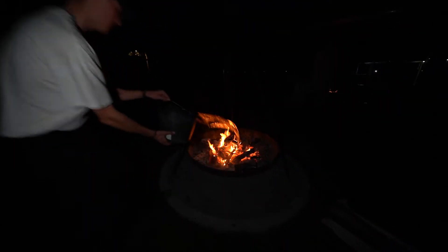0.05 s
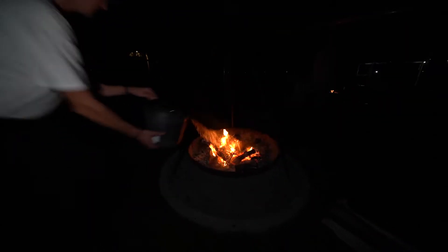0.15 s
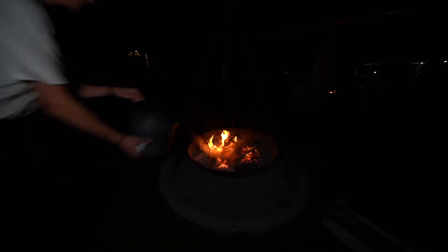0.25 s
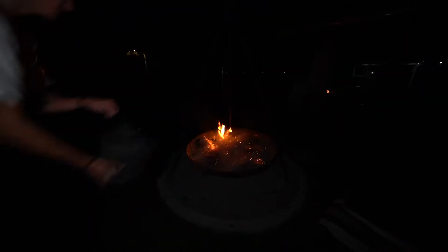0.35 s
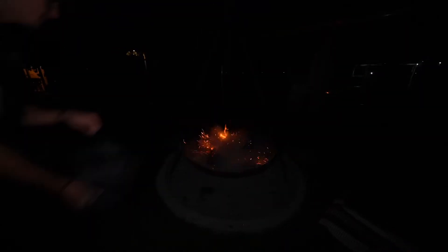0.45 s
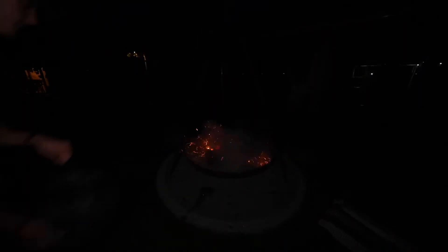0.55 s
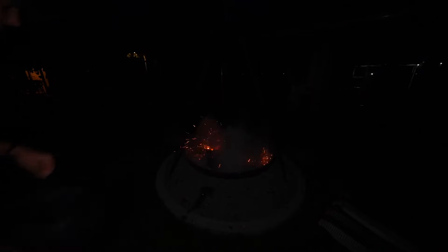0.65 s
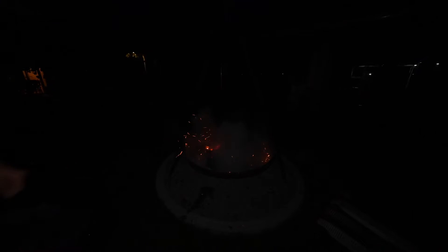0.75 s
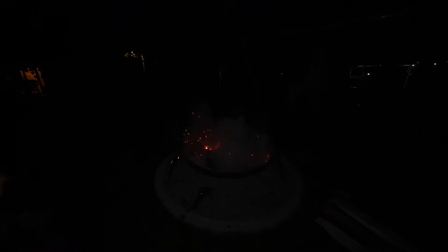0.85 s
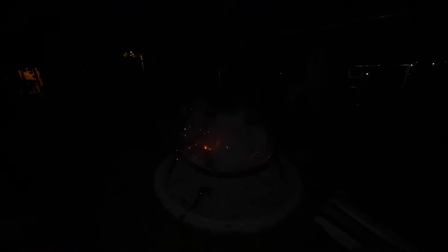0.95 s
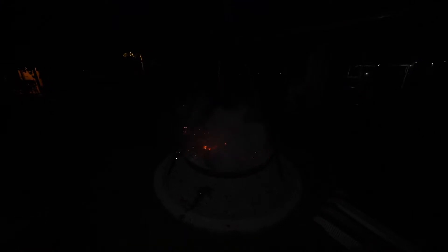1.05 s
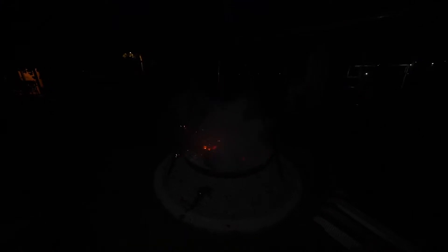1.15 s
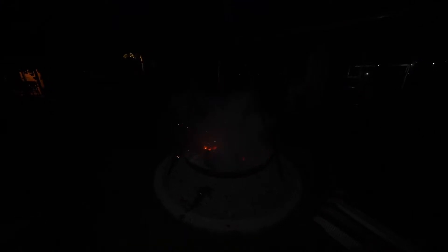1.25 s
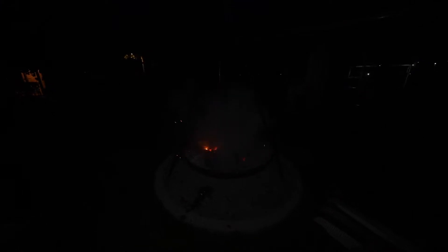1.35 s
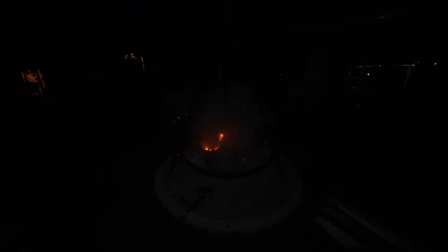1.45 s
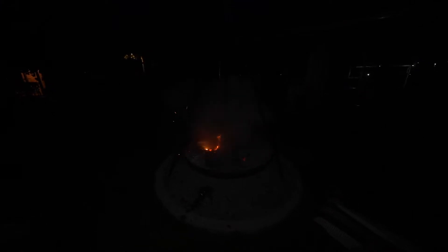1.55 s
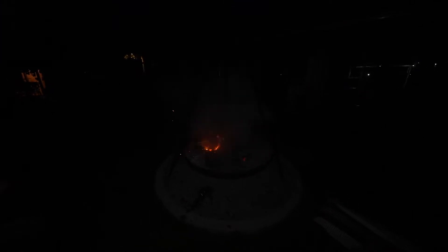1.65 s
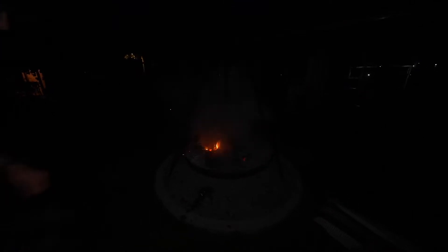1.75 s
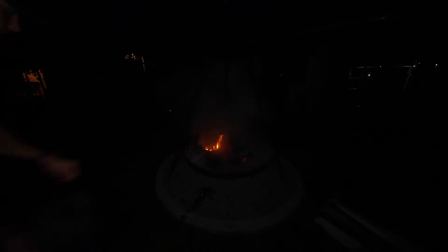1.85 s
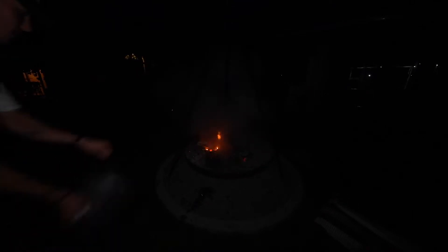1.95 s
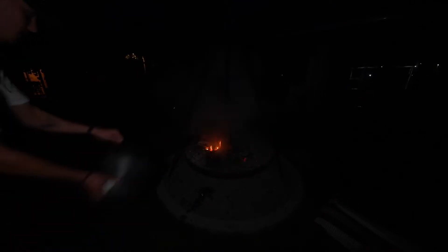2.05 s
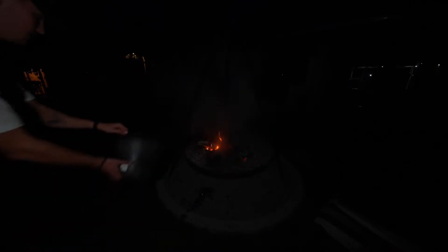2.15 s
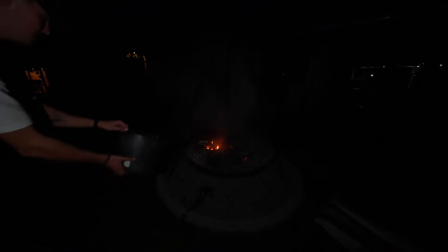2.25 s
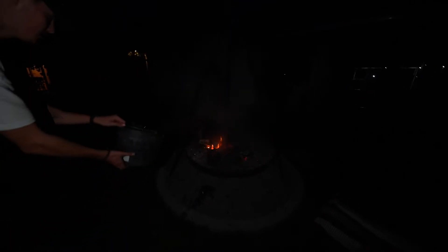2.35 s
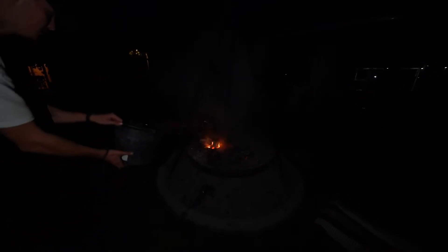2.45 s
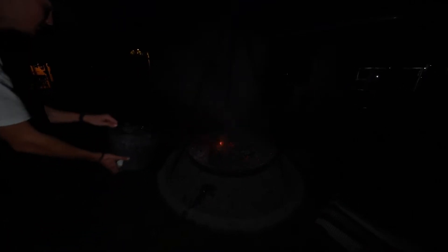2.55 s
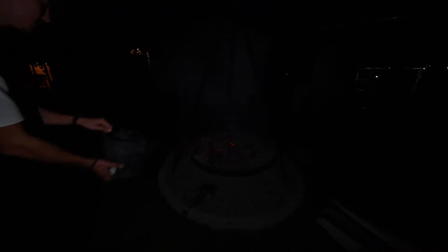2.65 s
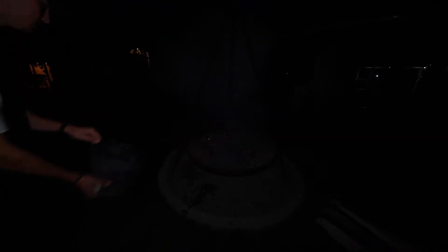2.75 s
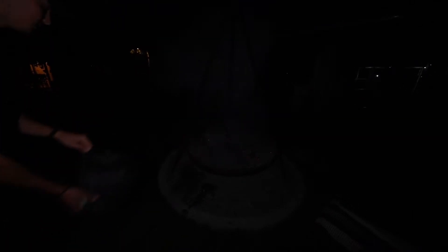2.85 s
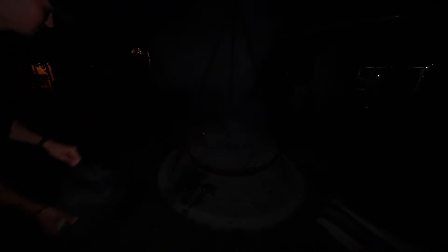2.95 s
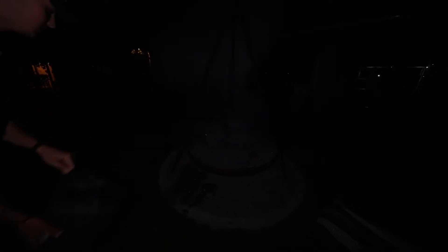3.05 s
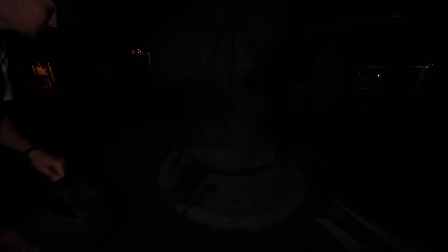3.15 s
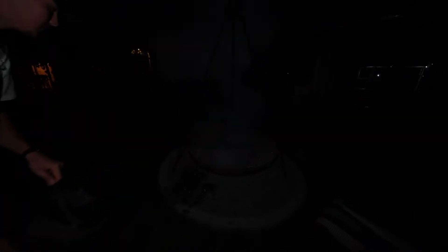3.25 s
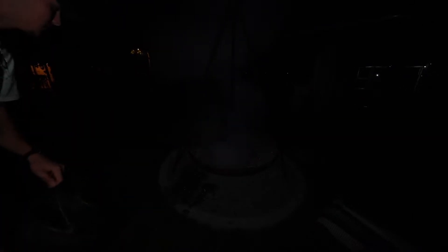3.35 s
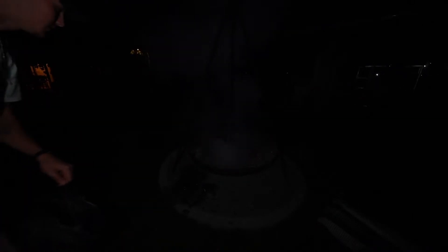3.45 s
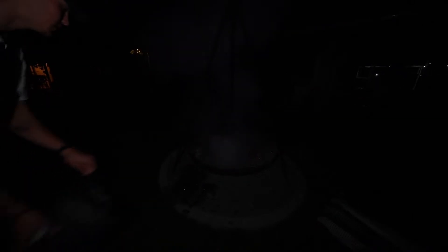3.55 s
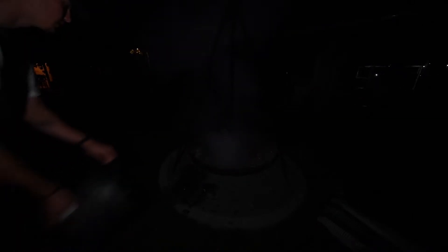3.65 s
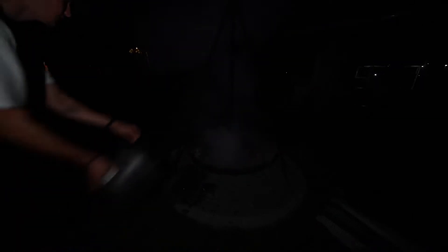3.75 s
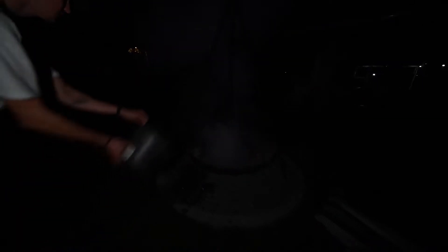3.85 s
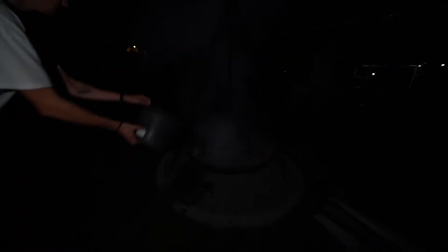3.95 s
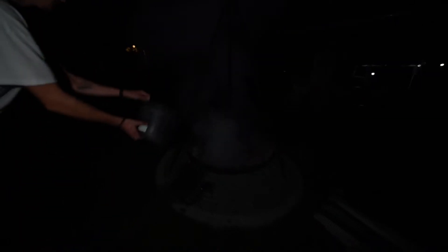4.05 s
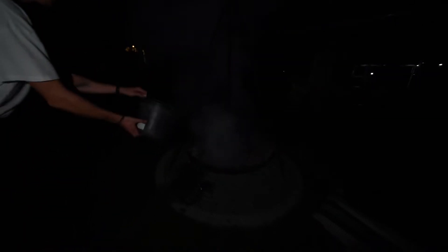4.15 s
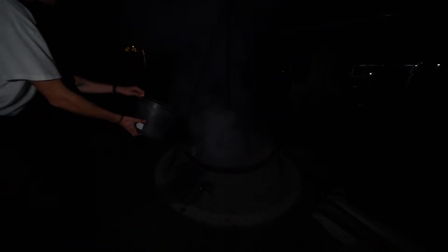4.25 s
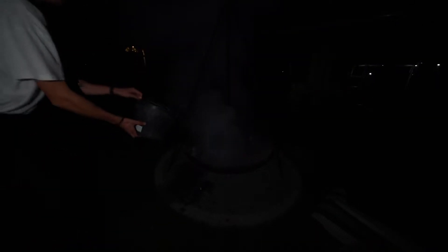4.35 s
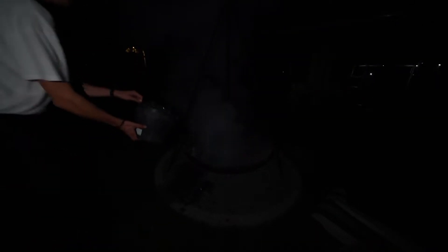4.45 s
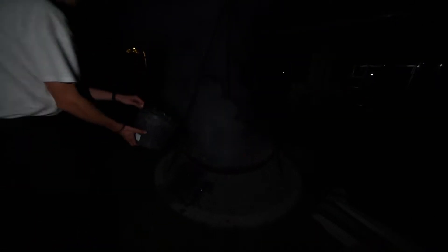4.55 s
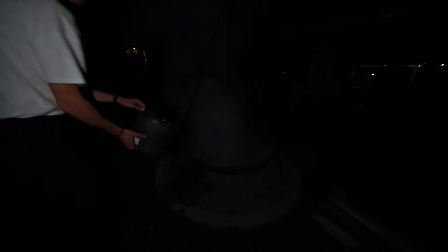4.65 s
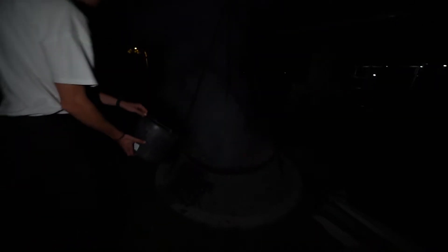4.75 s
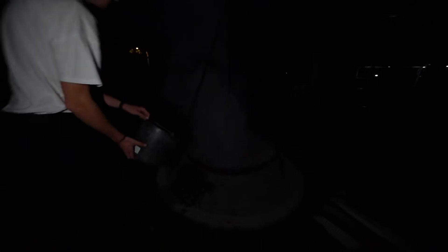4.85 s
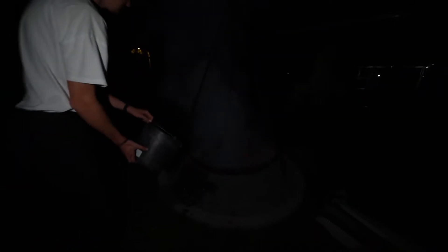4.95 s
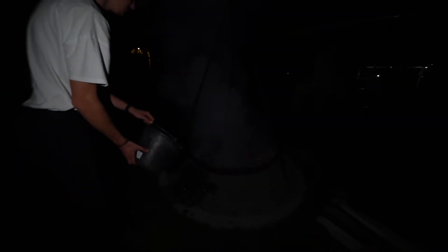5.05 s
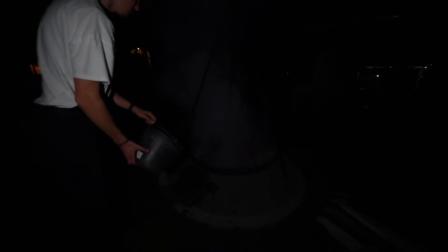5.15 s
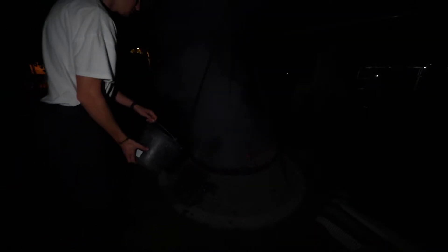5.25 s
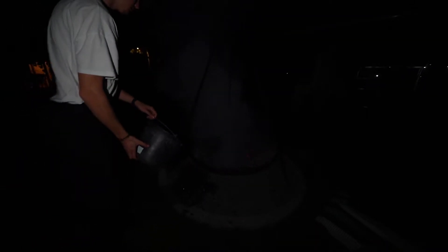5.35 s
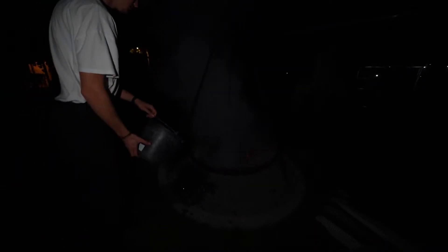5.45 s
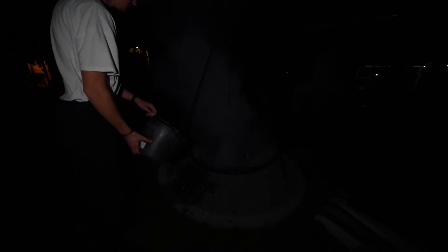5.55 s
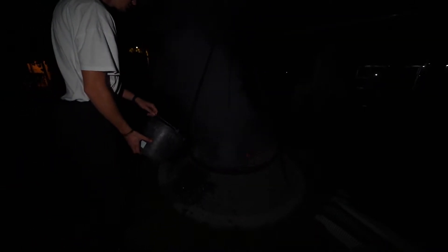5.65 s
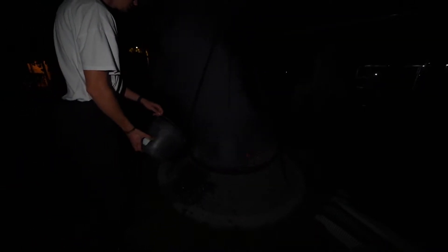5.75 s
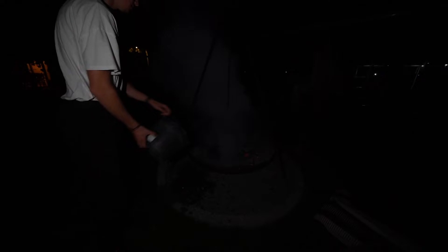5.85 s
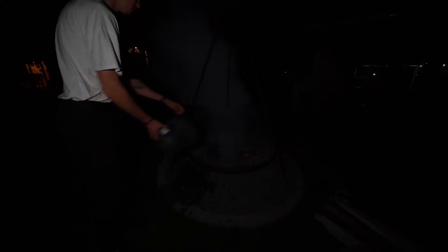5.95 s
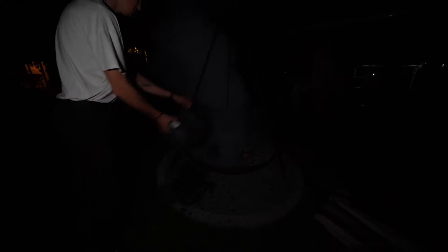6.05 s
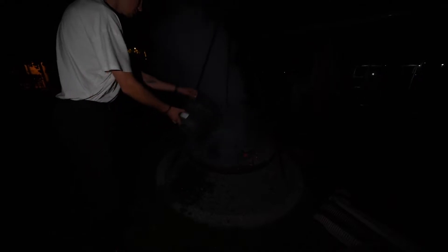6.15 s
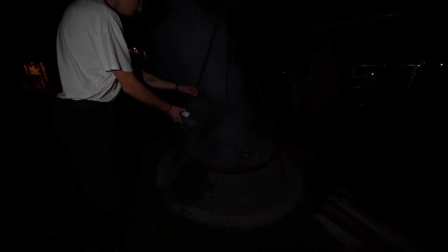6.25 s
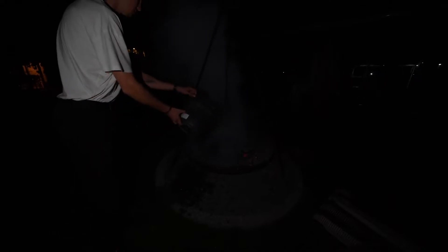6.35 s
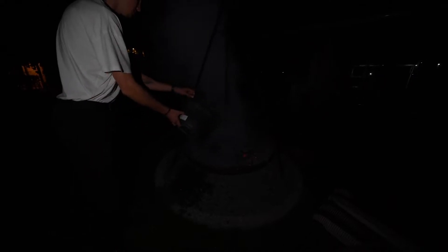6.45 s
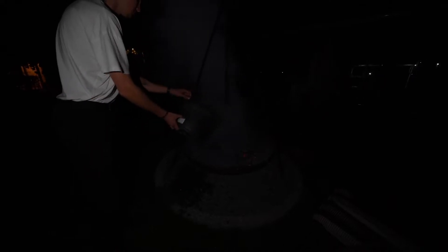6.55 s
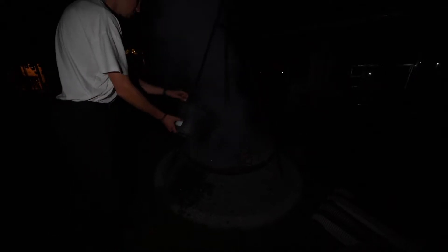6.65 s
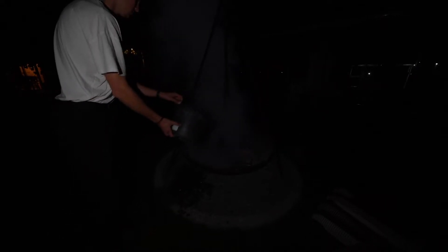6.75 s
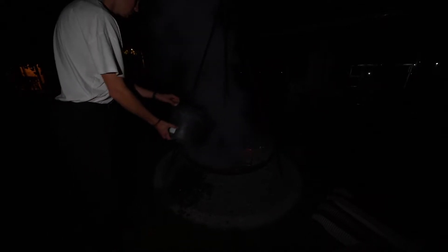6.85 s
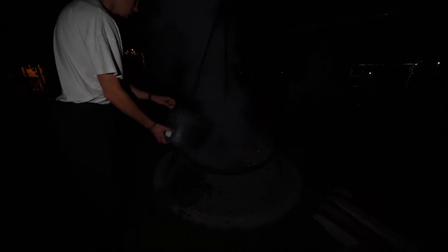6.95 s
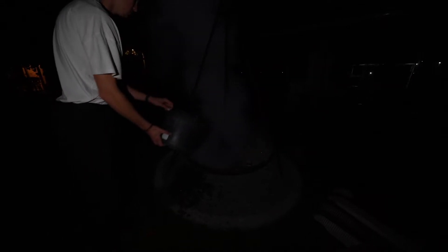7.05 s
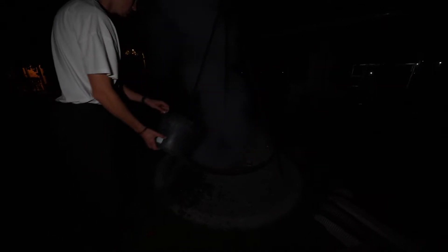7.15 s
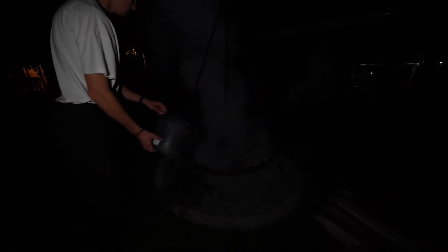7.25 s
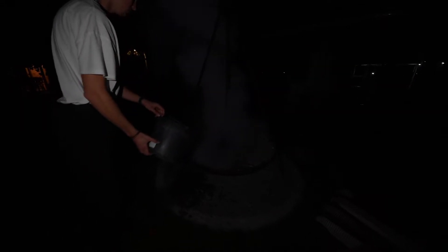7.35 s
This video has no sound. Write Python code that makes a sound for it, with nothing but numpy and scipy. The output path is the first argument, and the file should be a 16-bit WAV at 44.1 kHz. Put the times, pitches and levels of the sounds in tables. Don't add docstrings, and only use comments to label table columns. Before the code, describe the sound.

Water slaps in short clumped bursts onto burning wood and stone, each followed by thick steamy hissing, wet drops and tiny ember snaps.

```python
import sys
import numpy as np
from scipy import signal
from scipy.fft import rfft, irfft, next_fast_len
from scipy.io import wavfile
from scipy.ndimage import uniform_filter1d

SR = 44100
rng = np.random.default_rng(int(sys.argv[2]) if len(sys.argv) > 2 else 0)


def inscribe(sig):
    pcm = np.round(np.clip(np.atleast_2d(sig).T, -1, 1) * 32767)
    wavfile.write(sys.argv[1], SR, pcm.astype(np.int16))


def amplitude_ratio(level_db):
    exponent = np.asarray(level_db, float) / 20
    return 10 ** exponent


N = 326340
TOP_CUT_HZ = 16080

# (pitch_hz, side_minus_mid_db [dB])
HISS_WIDTH = [(60, -34), (110, -31), (200, -24), (380, -13), (700, -11), (1290, -9.5), (2380, -10.5),
              (4400, -7.5), (8120, -3.5), (15000, -1)]


def splashes():
    # (pitch_hz, level_db [dB per Hz])
    splash_tone = [(29, -63), (50, -21.5), (342, -6), (502, -6), (894, -1.5), (1280, -5), (1670, -3),
                   (2170, -4), (3780, -5), (4160, -8.5), (7410, -11), (13200, -18), (15600, -22)]
    # (pitch_hz, side_minus_mid_db [dB])
    splash_spread = [(60, -20), (110, -39), (200, -48), (380, -19), (700, -19), (1290, -9.5), (2380, -8),
                     (4400, -4), (8120, -1), (15000, 0)]
    level_db, low_db = sheets()
    over_db = np.clip(level_db + 36.5, -20, 8)
    _, aim_db, _, _, spray_db = latest_throw()
    top_db = spray_db + 0.27 * over_db - 0.3 * low_db
    pan_db = aim_db + 0.32 * over_db
    clumps = amplitude_ratio(1.2 * drift(60))
    drops = bursts(1600 * clumps, spread_db=2.0, hiss_db=-2, smear_s=.0005)
    water = coloured(drops, splash_tone, splash_spread, low_db, top_db, pan_db, patchy_db=0.48, shared_db=-0.2)
    return water * amplitude_ratio(level_db - 2.8)


def sheets():
    # (crest_s [s], crest_db [dB], rise_s [s], fall [dB per s], weight_db [dB in the lows])
    falling_sheets = [(.124, -32, 0.0012, 300, 1.5), (.157, -34.5, .012, 120, 6),
                      (.232, -32.5, 0.074, 60, 5), (.262, -19, 0.024, 54, -0.5), (.325, -29, 0.066, 105, 9),
                      (.484, -22.5, 0.055, 321, -7), (2.55, -25.5, 0.0063, 0, -9.5),
                      (2.66, -19.5, 0.039, 56, -6), (2.71, -22.5, 0.045, 111, 0),
                      (2.818, -21, 0.015, 100, -2), (2.837, -19.5, 0.028, 183, -12),
                      (2.876, -29, 0.035, 300, -20), (4.47, -37, .008, 250, 4), (4.5, -31, .008, 400, -16),
                      (4.522, -31, .015, 300, -14), (4.548, -15.5, 0.022, 372, -2),
                      (4.6, -26, 0.066, 84, -6.5), (4.666, -29, .015, 200, -16), (4.7, -38.5, .03, 25, -19),
                      (6.636, -41.5, .008, 500, 3), (6.7, -31, .006, 400, -12),
                      (6.725, -26.5, 0.028, 203, 3), (6.79, -41, .03, 68, -5)]
    swell_db, lasts_s, spray_leads_db = 9.5, 0.12, 5
    crest_s, crest_db, rise_s, fall, weight_db = np.transpose(falling_sheets)[:, :, None]
    steps = np.arange(0, N, 16)
    late = steps / SR - crest_s
    early = np.maximum(-late, 0) / np.maximum(rise_s, .0005)
    db = crest_db - swell_db * early - np.abs(fall) * np.maximum(late, 0)
    spent = np.clip(2 - late / lasts_s, 0, 1) ** 2
    power = amplitude_ratio(2 * db) * (early <= 1) * spent + 1e-12
    total = power.sum(axis=0)
    low_db = weight_db - spray_leads_db * np.minimum(early, 1)
    mean_low_db = (power * low_db).sum(axis=0) / total
    level_db = 10 * np.log10(total)
    return [np.interp(np.arange(N), steps, curve) for curve in (level_db, mean_low_db)]


def latest_throw():
    # (start_s [s], splash_pan_db [left-right dB], ember_pan_db [left-right dB],
    #          hiss_bright_db [dB], spray_bright_db [dB])
    throws = [
        (.123, -5.5, -4.5, 2, 1.5),
        (2.545, -3.5, -1.3, -.5, -3),
        (4.46, -6.5, -3, -1.5, -1),
        (6.62, -8, -6, -2, 1),
    ]
    start_s, *columns = np.transpose(throws)
    t = np.arange(N) / SR
    latest = np.maximum(np.searchsorted(start_s, t) - 1, 0)
    since_s = np.maximum(t - start_s[latest], 0)
    return [since_s] + [uniform_filter1d(column[latest], size=2000) for column in columns]


def sizzle():
    # (time_s [s], level_db [dB])
    boiling = [(.123, -51), (.22, -37.5), (.7, -34.5), (.95, -35), (1.2, -36.5), (1.5, -34.5),
               (1.85, -37.5), (2.1, -39.5), (2.5, -41.5), (2.95, -33), (3.4, -36.5), (3.9, -37.5),
               (4.44, -40), (4.8, -34.5), (5.2, -35), (5.8, -38), (6.55, -41), (7.4, -43)]
    # (pitch_hz, level_db [dB per Hz])
    steam_tone = [(35, -67), (60, -31.5), (351, -11.5), (521, -10.5), (599, -8), (849, -1), (1230, -5),
                  (1450, 1.5), (2050, 0.5), (2470, 3), (5320, -2), (8300, -1.5), (9200, -5), (13200, -6),
                  (15500, -11)]
    t = np.arange(N) / SR
    time_s, curve_db = np.transpose(boiling)
    level_db = np.interp(t, time_s, curve_db)
    since_s, _, pan_db, bright_db, _ = latest_throw()
    fresh = np.exp(-since_s / 0.54)
    low_db = 8 * fresh
    top_db = bright_db + 5 * fresh
    droplets = bursts(2500, spread_db=0.72, hiss_db=4.2, smear_s=.0001)
    steam = coloured(droplets, steam_tone, HISS_WIDTH, low_db, top_db, pan_db, patchy_db=.4, shared_db=.3)
    wet = np.arange(N) >= time_s[0] * SR
    return steam * amplitude_ratio(level_db - 1.0) * wet


def slapping_drops():
    # (start_s [s], peak_db [dB], pitch_hz [Hz], pan_db [left-right dB])
    slaps = [(0.124, -24.5, 2330, -6), (0.155, -28, 1000, -3), (0.168, -28, 1030, 2), (0.324, -18, 891, 0),
             (0.487, -28, 3100, -4), (0.533, -13, 2800, -2.5), (2.294, -28.5, 3440, -5),
             (2.533, -33, 945, 2), (2.553, -21, 2520, -4), (2.581, -19.5, 2470, -1),
             (2.651, -19.5, 1540, 0.0), (2.876, -24, 2600, 0), (4.470, -20, 2360, -3),
             (4.481, -32, 2410, -3.0), (4.498, -27, 1630, -3), (4.538, -20, 1900, -2), (4.547, -15, 844, 2),
             (4.557, -16, 4750, 5), (4.603, -24, 2200, -5), (4.667, -18.5, 2380, 1),
             (4.722, -24, 2780, -2.0), (6.563, -31.5, 4860, -1), (6.633, -30, 4460, 0),
             (6.669, -37, 2480, -1), (6.686, -27, 3530, -8), (6.702, -23, 4500, -6)]
    # (start_s [s], peak_db [dB], pitch_hz [Hz], pan_db
    # [left-right dB])
    plops = [
        (0.532, -19, 1150, -2.5),
        (2.268, -29.5, 1000, 5),
        (2.553, -21.5, 1110, 1),
        (7.364, -38.5, 590, 8),
    ]
    crack = dict(crack_s=0.0033, crack_hz=(500, 11000), soft_s=.0001)
    return pops(slaps, cycles=13, crack_db=1.5, **crack) + pops(plops, cycles=16, crack_db=-20, **crack)


def ember_spits():
    # (start_s [s], peak_db [dB], pitch_hz [Hz], pan_db [left-right dB])
    spits = [(2.602, -24, 9500, -3.0), (2.9044, -24, 11900, -1.0), (6.0935, -28, 10700, -2.0),
             (6.107, -24, 12200, -3.5), (6.582, -33, 9000, -4), (6.643, -33, 10000, -6),
             (6.672, -27, 13000, -6), (6.703, -28, 12500, -14), (7.0914, -35, 12800, -4.5),
             (7.0975, -25.5, 7960, -3.5), (7.1724, -37, 7400, -6.0), (7.2025, -34, 9190, -6.0),
             (7.2414, -34, 8010, -5.5)]
    return pops(spits, cycles=18, crack_db=-2, crack_s=0.0033, crack_hz=(2500, 15000), soft_s=.0001)


def tub_and_glugs():
    # (start_s [s], peak_db [dB], pitch_hz [Hz], pan_db [left-right dB])
    knocks = [
        (0.036, -53, 334, 3),
        (3.858, -38.5, 330, 2),
        (7.394, -51, 587, 1),
    ]
    # (start_s [s], peak_db [dB], pitch_hz [Hz], pan_db [left-right dB])
    glugs = [
        (2.258, -40, 945, 3.5),
        (3.059, -45, 275, 2),
        (3.093, -46, 330, 0.5),
        (3.161, -45, 331, 0.5),
        (3.892, -35.5, 293, -0.5),
        (4.549, -30, 356, 1),
        (5.989, -48, 288, 0.0),
        (6.712, -33, 333, 0),
    ]
    crack = dict(crack_s=0.064, crack_hz=(250, 1600), soft_s=0.00043)
    return pops(knocks, cycles=30, crack_db=0, **crack) + pops(glugs, cycles=36, crack_db=-22, **crack)


def pops(events, cycles, crack_db, crack_s, crack_hz, soft_s):
    out = np.zeros((2, N))
    t = np.arange(int(.12 * SR)) / SR
    crack_band = signal.butter(2, crack_hz, "band", fs=SR, output="sos")
    noise = rng.standard_normal((len(events), len(t)))
    cracks = rms_one(signal.sosfilt(crack_band, noise))
    for (start_s, peak_db, pitch_hz, pan_db), crack in zip(events, cracks):
        ring_s = cycles / pitch_hz
        ring = np.sin(2 * np.pi * pitch_hz * t) * amplitude_ratio(-60 * t / ring_s)
        ring *= 1 - np.exp(-t / soft_s)
        wave = ring / np.abs(ring).max() + amplitude_ratio(crack_db - 60 * t / crack_s) * crack
        sides = amplitude_ratio(peak_db + np.array([[pan_db], [-pan_db]]) / 2)
        at = round(start_s * SR)
        out[:, at:at + len(t)] += sides * wave[:N - at]
    return out


def ground_echo(x):
    lag = round(0.0021 * SR)
    echo = np.pad(x, ((0, 0), (lag, 0)))[:, :N]
    no_bass = signal.butter(2, 245, "high", fs=SR, output="sos")
    return signal.sosfilt(no_bass, x + amplitude_ratio(-8.5) * echo)


def night():
    # (pitch_hz, level_db [dB per Hz])
    night_tone = [(30, -40), (200, -21.5), (330, -10), (600, -7.5), (1000, -6), (1500, -7.5), (2200, -13),
                  (6000, -16), (15600, -16.5)]
    flutter = bursts(150, spread_db=5.3, hiss_db=0, smear_s=0.0083)
    air = coloured(flutter, night_tone, HISS_WIDTH, 0, 0, 0, patchy_db=1.4, shared_db=0.7)
    return air * amplitude_ratio(-54.5)


def bursts(per_s, spread_db, hiss_db, smear_s):
    born = rng.random(N) < per_s / SR
    powers = born * amplitude_ratio(2 * spread_db * np.minimum(rng.exponential(1, N), 4))
    puffs = signal.lfilter([1], [1, -np.exp(-1 / (smear_s * SR))], powers + 1e-18)
    loudness = np.sqrt(puffs / puffs.mean() + amplitude_ratio(2 * hiss_db))
    return loudness * rng.standard_normal((2, N))


def coloured(mid_side, spectrum, width, low_db, top_db, pan_db, patchy_db, shared_db):
    size = next_fast_len(N)
    hz = np.arange(size // 2 + 1) * SR / size
    level_db = at_hz(spectrum, hz) + np.array([0 * hz, at_hz(width, hz)])
    cepstrum = irfft(level_db * np.log(10) / 20, size)
    cepstrum[:, 1:size // 2] *= 2
    cepstrum[:, size // 2 + 1:] = 0
    shaped = rfft(mid_side, size) * np.exp(rfft(cepstrum))
    mid_power = 2 * np.sum(np.abs(shaped[0][hz < TOP_CUT_HZ]) ** 2) / size / N
    shaped /= np.sqrt(mid_power)
    place = np.clip(2 * np.log2((hz + 1) / 90), 0, 15)
    together = shared_db * drift(9.4)
    out = 0
    for band in range(16):
        share = np.cos(np.pi / 2 * np.clip(place - band, -1, 1)) ** 2
        octaves = band / 2 - np.log2(3000 / 90)
        lows = low_db * np.clip(-octaves / 3, 0, 1.3)
        highs = top_db * np.clip((octaves - .6) / 1.9, 0, 1.2)
        lean_db = pan_db / 2 * np.clip(0.67 + octaves / 5, 0, 1.5)
        swell = amplitude_ratio(lows + highs + together + patchy_db * drift(4.7))
        mid, side = swell * irfft(shaped * share, size)[:, :N]
        out = out + np.array([(mid + side) * amplitude_ratio(lean_db), (mid - side) * amplitude_ratio(-lean_db)])
    return out


def drift(rate):
    r = np.exp(-80 * np.pi * rate / SR)
    noise = rng.standard_normal(N // 40 + 2002)
    slow = signal.lfilter([1], [1, -2 * r, r * r], noise)[2000:]
    return np.interp(np.arange(N) / 40, np.arange(len(slow)), rms_one(slow))


def at_hz(points, hz):
    pitch_hz, level_db = np.transpose(points)
    return np.interp(np.log(hz + 1), np.log(pitch_hz), level_db)


def rms_one(x):
    return x / np.sqrt(np.mean(x ** 2) + 1e-20)


def scene():
    sharp = slapping_drops() + ember_spits() + tub_and_glugs()
    return splashes() + sizzle() + ground_echo(sharp) + night()


def band_limit(x):
    return signal.sosfilt(signal.butter(12, 16520, fs=SR, output="sos"), x)


def record(dry):
    thin = signal.sosfilt(signal.butter(1, 100, "high", fs=SR, output="sos"), dry)
    cut = signal.sosfilt(signal.cheby2(20, 60, TOP_CUT_HZ, fs=SR, output="sos"), thin)
    return band_limit(cut)


dry = scene()
out = record(dry)
inscribe(out)
```